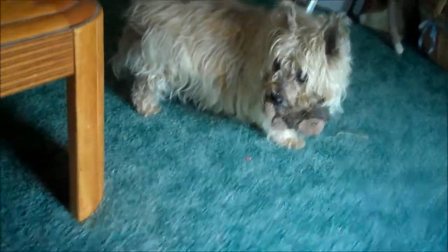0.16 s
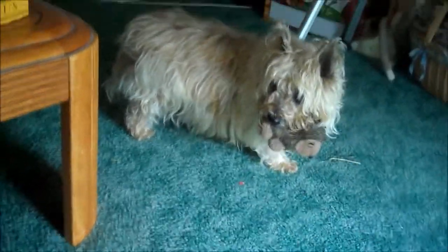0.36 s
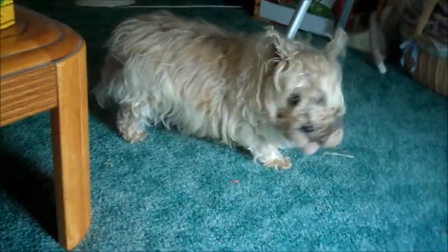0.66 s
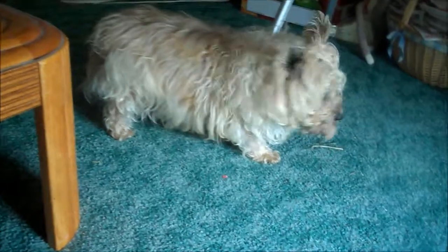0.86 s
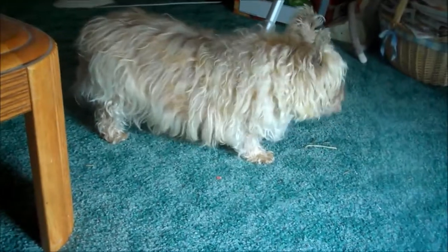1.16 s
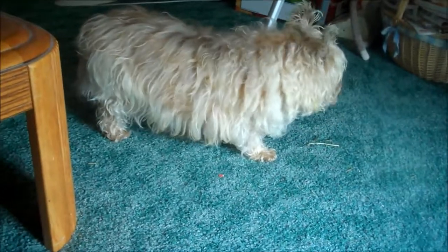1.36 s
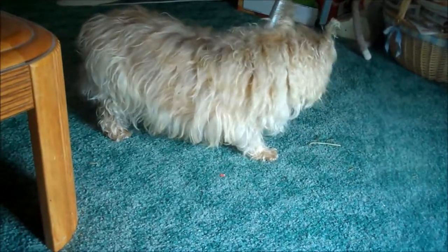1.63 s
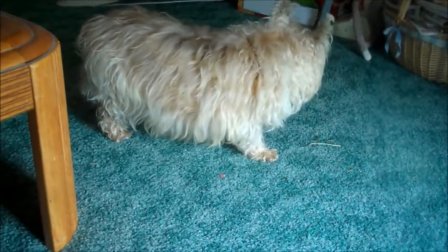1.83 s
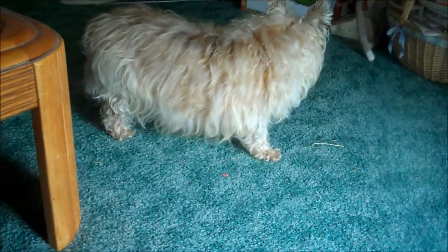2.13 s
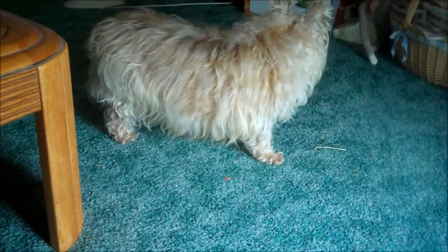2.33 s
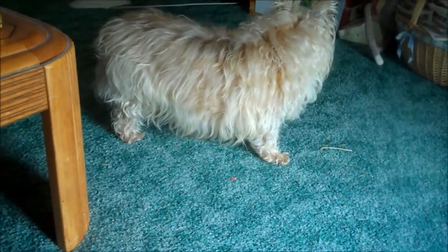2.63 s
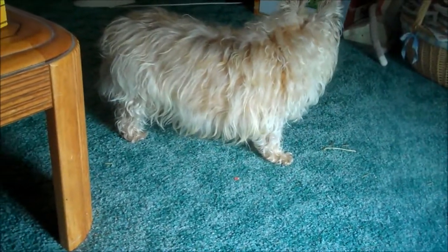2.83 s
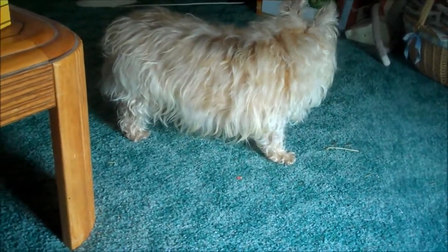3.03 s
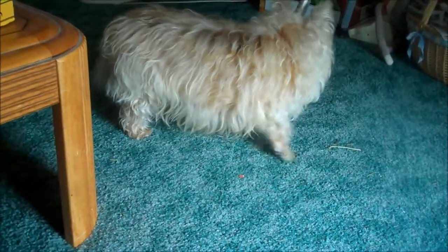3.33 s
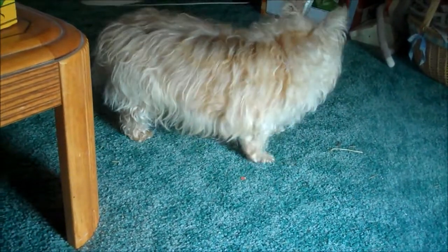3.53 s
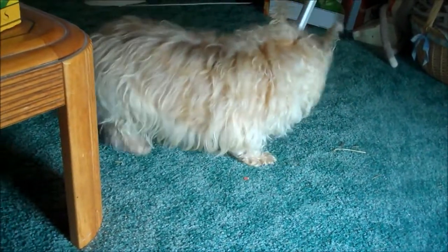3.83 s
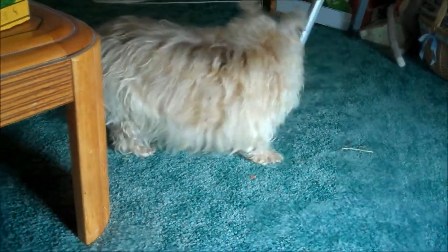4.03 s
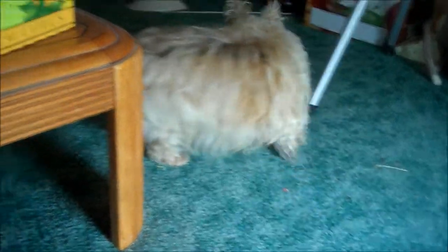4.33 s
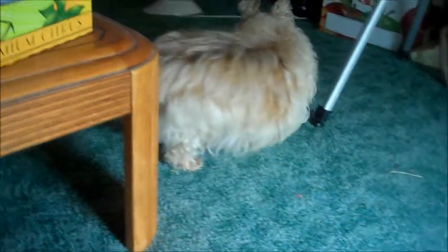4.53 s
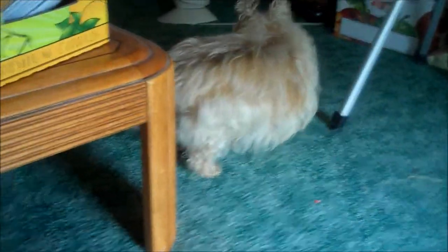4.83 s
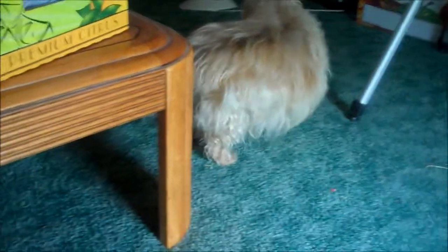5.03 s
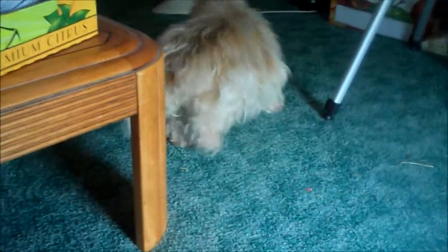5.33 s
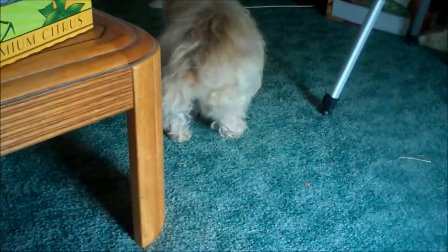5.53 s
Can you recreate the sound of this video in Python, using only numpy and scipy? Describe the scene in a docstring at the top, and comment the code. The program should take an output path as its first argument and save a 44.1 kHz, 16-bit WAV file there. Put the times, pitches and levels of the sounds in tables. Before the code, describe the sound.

A small dog whimpers nearby in a carpeted room with a short ring, over steady, faint microphone hiss. Each thin, high whine slides through its nose on a push of air that hisses in the nostrils, and most break downward into a short, low hoot. The first whine rises from the very start to about 0.4 seconds. A shorter, higher one follows at 0.7 seconds. The third slides down from 1.3 seconds and ends in a clear hoot at 1.6. After a pause, a stronger whine climbs from 2.4 to 2.7 seconds. The highest, a brief squeak, comes at 3 seconds, and a softer, wavering one at about 3.5. A faint snuff at 3.9 seconds precedes the last whine at 4.3, which sinks into the longest hoot. Three quick snuffs between 5 and 5.2 seconds end it, leaving only the hiss.

```python
"""A small terrier whimpers in a briefly ringing, carpeted room, over the steady hiss of a small camera.
Seven thin whines slide through its nose, each on a push of air that hisses in the nostrils.
Most break downward into a short, low hoot as the vocal folds slacken. A faint snuff comes before
the last whine, which sinks into the longest hoot. Three quick snuffs end it, about five seconds in."""
import sys
import numpy as np
from scipy import signal
from scipy.fft import rfft, irfft, next_fast_len
from scipy.io import wavfile
from scipy.ndimage import uniform_filter1d, map_coordinates

SR = 44100
rng = np.random.default_rng(int(sys.argv[2]) if len(sys.argv) > 2 else 0)


def generate_wav(signal):
    """Clip the signal to [-1, 1] and save it as 16-bit WAV at the path in sys.argv[1]."""
    frames = np.transpose(np.atleast_2d(signal))
    scaled = np.clip(frames, -1, 1) * 32767
    pcm = np.round(scaled).astype(np.int16)
    wavfile.write(sys.argv[1], SR, pcm)


N = 250916
TOP_HZ = 14220  # the camera's band limit

# glide of each whine: (time [s], pitch [Hz], relative level [dB])
WHINE_1 = [(0.0, 489.8, -52.5), (0.108, 520.8, -47), (0.196, 594, -42), (0.25, 701, -41.5),
           (0.264, 676, -46.5), (0.32, 733.5, -34.5), (0.376, 700.4, -47), (0.406, 679, -47.5),
           (0.425, 649, -45.5)]
WHINE_2 = [(0.738, 883, -44.5), (0.754, 823, -34.5), (0.77, 798.3, -40), (0.8, 830.4, -35.5),
           (0.876, 832.4, -47.5), (0.9, 824, -73.5)]
WHINE_3 = [(1.285, 875, -42), (1.295, 831.4, -39.5), (1.321, 792, -37), (1.345, 794, -38),
           (1.377, 724, -45), (1.399, 731, -46.5), (1.445, 678.4, -43), (1.549, 650, -53),
           (1.555, 629, -41.5)]
WHINE_4 = [(2.38, 758, -55), (2.4, 728, -48.5), (2.422, 786, -55), (2.432, 805.6, -44), (2.468, 836, -36.5),
           (2.616, 863.7, -32), (2.665, 843, -34.5)]
WHINE_5 = [(2.995, 1072, -49.5), (3.009, 1063, -36), (3.041, 1067, -41.5), (3.065, 1019, -36.5)]
WHINE_6 = [(3.43, 799, -49.5), (3.466, 729, -48), (3.498, 793.6, -48), (3.52, 774, -49),
           (3.564, 766.5, -46), (3.578, 773, -71), (3.592, 764.5, -48.5), (3.668, 824, -39),
           (3.69, 803, -43)]
WHINE_7 = [(4.312, 825, -48.5), (4.356, 791, -46.5), (4.368, 821, -39.5), (4.386, 846, -50.5),
           (4.415, 818, -41)]
# notes of the slackened folds:
# (time [s], hold [s], release [s], pitch [Hz], relative level [dB], relative escaping air [dB])
HOOTS = [(0.439, 0.012, 0.0069, 417, -53, -39.5), (0.937, 0.0091, .007, 411, -54, -46),
         (1.568, 0.019, 0.016, 398, -28, -57), (2.275, 0.023, 0.0049, 390.5, -48.5, -66),
         (2.683, 0.013, 0.0023, 414.7, -34, -45), (3.081, 0.014, 0.0025, 425, -31, -45),
         (3.551, 0.015, 0.0037, 648, -48, -73), (3.700, 0.0138, 0.0023, 426.6, -35.5, -38.5),
         (4.436, 0.12, 0.03, 437.5, -32.5, -68.5)]


def amp(db):
    """Decibels to gain."""
    return 10 ** (np.asarray(db) / 20)


def unit(x):
    """x at rms 1."""
    return x / np.sqrt(np.mean(x ** 2) + 1e-20)


def along(points, hz):
    """Read (frequency, value) points on a log frequency axis."""
    freqs, values = np.transpose(points)
    return np.interp(np.log(hz + 1), np.log(freqs + 1), values)


def curves(rows, t):
    """Read each column after the time column at the times t."""
    times, *columns = np.transpose(rows)
    return [np.interp(t, times, column) for column in columns]


def samples(start, end, margin=0.02):
    """Sample numbers from just before start to just after end."""
    return np.arange(max(0, int((start - margin) * SR)), min(N, int((end + margin) * SR)))


def wobble(rate, t):
    """A smooth random curve, rate knots a second."""
    return map_coordinates(rng.standard_normal(int(N / SR * rate) + 4), [t * rate])


def hump(hz, centre_hz, width_hz):
    """A resonance shape, 1 at its centre."""
    return 1 / (1 + (2 * (hz - centre_hz) / width_hz) ** 2)


def filtered(x, response):
    """x through a complex frequency response."""
    size = x.shape[-1]
    padded = next_fast_len(size + SR // 10)
    return irfft(rfft(x, padded) * response(np.fft.rfftfreq(padded, 1 / SR)), padded)[..., :size]


def noise(colour, size=N):
    """Noise of rms 1 with the given spectrum."""
    return unit(filtered(rng.standard_normal(size), lambda hz: amp(along(colour, hz))))


def pair(a, b, likeness):
    """Mix two unrelated signals to stereo with the given left-right likeness."""
    angle = lambda hz: np.arccos(np.clip(along(likeness, hz), -1, 1)) / 2
    mid = filtered(a, lambda hz: np.cos(angle(hz)))
    side = filtered(b, lambda hz: np.sin(angle(hz)))
    return np.array([mid + side, mid - side])


def background(level_db=-60.5):
    """A wide bed of steady microphone hiss over faint room rumble."""
    # spectrum of the bed: (frequency [Hz], level [dB])
    colour = [(8, -33), (22, -16.5), (33, -1), (60, -5), (80, -2.5), (105, -7), (400, -4), (1000, -5.5),
              (2000, -8), (6000, -12.5), (14000, -16)]
    # its stereo image: (frequency [Hz], left-right likeness [0-1])
    likeness = [(30, 0.068), (80, 0.035), (300, 0.083), (1500, 0.036), (10000, 0.023)]
    return amp(level_db) * pair(noise(colour), noise(colour), likeness)


def airflow(t, rise_db=14.5, sag_db=3, attack_s=0.043):
    """Each push of air through the nose arches up to a crest, sags and is let go."""
    # breaths: (start [s], crest [s], end [s], release [s], relative crest level [dB])
    pushes = [(0.0, 0.317, 0.43, 0.008, -41), (0.639, 0.758, 0.91, 0.057, -45.5),
              (1.195, 1.31, 1.617, .025, -46.5), (2.266, 2.62, 2.73, 0.039, -48.5),
              (2.968, 3.08, 3.11, 0.045, -45.5), (3.382, 3.515, 3.61, 0.12, -48),
              (4.22, 4.45, 4.7, 0.042, -48)]
    flow = np.zeros(len(t))
    for start, crest, end, release, db in pushes:
        rising = np.clip((crest - t) / (crest - start), 0, 1)
        sagging = np.clip((t - crest) / (end - crest), 0, 1)
        arch = amp(db - rise_db * rising ** 2 - sag_db * sagging ** 2)
        flow += arch * np.exp(-np.maximum(start - t, 0) / attack_s - np.maximum(t - end, 0) / release)
    return flow


def nose_air(hiss_db=-7, gust_db=1.95):
    """Turbulence in the nostrils rings the nasal passages; extra air escapes as the folds slacken."""
    # spectrum of the nostril hiss: (frequency [Hz], level [dB])
    nostrils = [(150, -19), (400, -6.5), (1100, -2.5), (1800, -11.5), (2450, -6), (2900, -6), (3550, -1),
                (4400, -3), (5600, -3), (6900, -0.5), (8600, -7), (9600, -12.5), (11500, -19), (14000, -29)]
    # nasal resonances: (centre [Hz], width [Hz], boost [dB])
    modes = [(3330, 140, 2.5), (5460, 420, 9.5), (6880, 400, 4.5), (8220, 230, 7.5)]
    t = np.arange(N) / SR
    escaping = sum(amp(db) * swell(t - start, hold, release) for start, hold, release, _, _, db in HOOTS)
    passages = lambda hz: amp(sum(db * hump(hz, centre, width) for centre, width, db in modes))
    hiss = unit(filtered(noise(nostrils), passages))
    return (airflow(t) + escaping) * amp(hiss_db + gust_db * wobble(80, t)) * hiss


def folds(span, pitch, level_db, upper_db, rough, second_db, tilt_db,
          mouth_hz, mouth_db, ring_hz, ring_db, shimmer_db=4, flutter_db=3.5, rasp_db=-26):
    """The vocal folds sing a thin tone whose overtones slide through the resonances of the muzzle."""
    # the second harmonic swells across the throat's first resonance:
    # (pitch [Hz], level over the fundamental [dB])
    second_swell = [(400, -19.5), (440, -14.5), (490, 5), (560, 7), (650, -3), (700, -5.5), (770, -13.5),
                    (850, -24.5), (1060, -12)]
    # overtone colour of throat and muzzle: (frequency [Hz], gain [dB])
    throat = [(1200, 17.5), (1750, -13), (2150, 9), (2550, 1.5), (2900, -7.5), (3400, 1), (4400, -3.5),
              (5100, 3), (5900, -4), (6800, 5), (7700, -4.5), (8400, -3), (9300, -14.5), (14000, -23)]
    # spectrum of the slack folds' rasp: (frequency [Hz], level [dB])
    rasp_colour = [(300, -43), (650, -9), (1100, 8), (1350, -3.5), (1800, -63), (4000, -31)]
    t = span / SR
    second_gain = amp(level_db + second_db + along(second_swell, pitch))
    waver = 0.0248 * rough * wobble(60, t)
    # the folds turn unsteady while the pitch collapses
    fall_octaves_per_s = uniform_filter1d(np.maximum(0, -np.gradient(np.log2(pitch)) * SR), size=600)
    rough = np.clip(rough + 0.013 * fall_octaves_per_s, 0, 1)
    # uneven cycles blur the high overtones far more than the fundamental
    jitter = 0.033 * rough * wobble(450, t)
    pitch = pitch * (1 + jitter + waver)
    phase = 2 * np.pi * np.cumsum(pitch) / SR
    orders = np.arange(3, 21)[:, None]
    hz = orders * pitch
    mouth = mouth_db * hump(hz, mouth_hz, width_hz=440)
    nasal_ring = ring_db * hump(hz, ring_hz, width_hz=450)
    gains = amp(along(throat, hz) + tilt_db * np.log2(orders) + mouth + nasal_ring) * (hz < TOP_HZ)
    gains /= np.linalg.norm(gains, axis=0)
    # each overtone swells and fades on its own
    flutter = amp(flutter_db * np.array([wobble(45, t) for _ in orders]))
    offsets = rng.uniform(0, 2 * np.pi, orders.shape)
    upper = np.sum(gains * flutter * np.sin(orders * phase + offsets), axis=0)
    tone = amp(level_db) * np.sin(phase) + second_gain * np.sin(2 * phase) + amp(upper_db) * upper
    # below 700 Hz the slack folds leak a rasping puff once a cycle
    slack = np.clip((700 - pitch) / 200, 0, 1)
    opening = (1 + np.sin(phase)) / 2
    rasp = slack * (1 + rough) * amp(level_db + rasp_db) * opening * noise(rasp_colour, len(span))
    shimmer = amp(rough * shimmer_db * wobble(160, t))
    return np.sqrt(2) * (tone + rasp) * shimmer


def whine(contour, rough, second_db, overtone_db, *muzzle):
    """One whine eases in from above, glides and breaks downward; a harder push of air brightens it."""
    onset_s, onset_ratio, onset_db = 0.003, 1.0395, 4.5
    break_s, break_hz, break_fade_db, break_dull_db = 0.019, 458, 18.5, 10
    overtone_attack_s, fade_s = 0.01, 0.0052
    (start, start_hz, start_db), (end, _, end_db) = contour[0], contour[-1]
    first, last = start - onset_s, end + break_s
    onset = (first, start_hz * onset_ratio, start_db - onset_db)
    collapse = (last, break_hz, end_db - break_fade_db)
    span = samples(first, last)
    t = span / SR
    pitch, level_db = curves([onset, *contour, collapse], t)
    push_db = 20 * np.log10(airflow(t))
    # the overtones follow tone and breath, arrive late and drain away in the break
    upper_db = overtone_db + 0.3 * (level_db - level_db.max()) + 0.22 * (push_db - push_db.max())
    upper_db -= onset_db * np.exp(-np.maximum(t - first, 0) / overtone_attack_s)
    upper_db -= break_dull_db * np.clip((t - end) / break_s, 0, 1)
    gate = np.clip(1 + np.minimum(t - first, last - t) / fade_s, 0, 1)
    out = np.zeros(N)
    out[span] = gate * folds(span, pitch, level_db, upper_db, rough, second_db, *muzzle)
    return out


def whimper():
    """Seven whines through the nose, each with its own glide and muzzle colour."""
    # voicing: (glide, roughness [0-1], second harmonic gain [dB], relative overtone level [dB],
    # tilt [dB/octave], mouth resonance [Hz], its gain [dB], nasal ring [Hz], its gain [dB])
    whines = [(WHINE_1, 0.3, 0, -49, -3.2, 3100, 6.6, 8500, 18),
              (WHINE_2, 0.095, 3.8, -43, -3.2, 2230, -8, 6650, 6.3),
              (WHINE_3, 0.184, -1.4, -50.5, -0.39, 2430, 6.2, 3400, 11),
              (WHINE_4, 0.082, -7, -49.5, -0.12, 2570, 7.7, 6800, 3.4),
              (WHINE_5, .13, -0.95, -48, -2.1, 1800, 1, 4250, 5.8),
              (WHINE_6, 0.203, 3.6, -50.5, 0, 2000, -0.86, 5480, 8.4),
              (WHINE_7, .2, -0.9, -57, .3, 2400, -0.77, 4900, 6)]
    return sum(whine(*row) for row in whines)


def swell(age, hold, release):
    """Envelope of a hoot: attack, hold and exponential release; longer hoots swell more slowly."""
    attack_s = 0.0039 + 0.071 * hold
    return (1 - np.exp(-np.maximum(age, 0) / attack_s)) * np.exp(-np.maximum(age - hold, 0) / release)


def hoots(overtone_db=-30, scoop_hz=71.4, settle_s=0.00812, sag_hz_per_s=150):
    """Slackened folds give short, dull, low notes that start high, settle and sag."""
    out = np.zeros(N)
    for start, hold, release, hz, db, _ in HOOTS:
        span = samples(start, start + hold + np.log(1000) * release)
        age = np.maximum(span / SR - start, 0)
        pitch = hz + scoop_hz * np.exp(-age / settle_s) - sag_hz_per_s * age
        tone = folds(span, pitch, db, db + overtone_db, rough=0.17, second_db=-3, tilt_db=6,
                     mouth_hz=2300, mouth_db=-18, ring_hz=3670, ring_db=14)
        out[span] += tone * swell(age, hold, release)
    return out


def snuffs():
    """Sharp puffs of air from the dog's nose."""
    # snuffs: (time [s], level [dB], rise [s], 60 dB decay [s])
    puffs = [(3.895, -54.5, 0.017, 0.19), (5.018, -38.5, 0.0031, 0.1), (5.047, -46, 0.0028, 0.12),
             (5.19, -40.5, 0.00067, 0.055)]
    # their spectrum: (frequency [Hz], level [dB])
    colour = [(100, -25), (200, -10.5), (400, -1), (600, -0.5), (1200, -10), (1600, -4.5), (2000, -10),
              (3200, -9), (3700, -13), (6000, -5), (7600, -10), (8500, -17), (14000, -30)]
    t = np.arange(N) / SR
    envelope = np.zeros(N)
    for start, db, rise, t60 in puffs:
        age = np.maximum(t - start, 0)
        envelope += amp(db - 60 * age / t60) * (1 - np.exp(-age / rise))
    return envelope * noise(colour)


def furniture(x, scatter_db=-7, corner_hz=3000, count=8):
    """Nearby table legs and edges throw back the treble, combing it differently left and right."""
    delays_s = rng.uniform(0.001, 0.012, (2, count))
    gains = rng.choice([-1, 1], delays_s.shape) / np.sqrt(count)
    taps = np.zeros((2, SR // 50))
    np.put_along_axis(taps, (delays_s * SR).astype(int), gains, axis=1)
    treble = filtered(x, lambda hz: hz ** 2 / (hz ** 2 + corner_hz ** 2))
    return amp(scatter_db) * signal.fftconvolve(treble[None], taps, axes=1)[:, :N]


def ports(x):
    """The dog's sound reaches the two microphone ports with a level and phase difference."""
    # the dog turns away: (time [s], left minus right [dB])
    head_turn = [(0, 3), (2.7, 2.2), (3.0, 2), (4.6, 0.5)]
    # level between the ports: (frequency [Hz], left minus right [dB])
    balance = [(380, -1.5), (700, 0), (1300, -3), (2400, -1), (3800, -2.5), (5200, -6), (6050, -16),
               (6900, 9), (8000, 5), (8600, 13), (10000, 12), (14000, -5)]
    # phase between the ports: (frequency [Hz], left lead [rad])
    lead = [(300, 0.06), (1000, 0.32), (2000, 0.8), (2600, -1.35), (3300, -1.3), (5600, -1.7), (7000, 1.9),
            (8700, -3), (13000, -0.9)]
    sides = np.array([[0.5], [-0.5]])
    panned = x * amp(sides * curves(head_turn, np.arange(N) / SR)[0])
    response = lambda hz: amp(sides * along(balance, hz)) * np.exp(1j * sides * along(lead, hz))
    return filtered(panned, response)


def room(send, predelay_s=0.0045):
    """The carpeted room adds a short diffuse tail, centred in the lows and wide in the highs."""
    # tone of the room: (frequency [Hz], gain [dB])
    colour = [(150, 5), (450, -3), (1000, 1), (2500, 0.5), (4000, 0.5), (7000, 0), (12000, 3.5)]
    # its ring: (frequency [Hz], 60 dB decay [s])
    decay = [(200, 0.27), (450, 0.37), (1000, 0.4), (3000, 0.31), (7000, 0.39), (13000, 0.12)]
    # its stereo image: (frequency [Hz], left-right likeness [0-1])
    likeness = [(400, 0.99), (1000, 0.92), (2500, 0.092), (6000, 0)]
    coloured = filtered(send, lambda hz: amp(along(colour, hz)))
    hz, t, bands = signal.stft(rng.standard_normal((2, SR // 2)), SR, nperseg=256)
    tail = signal.istft(bands * amp(-60 * t / along(decay, hz)[:, None]), SR, nperseg=256)[1]
    tail *= np.clip(np.arange(tail.shape[1]) / SR / predelay_s - 1, 0, 1)
    wet = signal.fftconvolve(coloured[None], tail / np.linalg.norm(tail[0]), axes=1)[:, :N]
    return pair(*wet, likeness)


def scene(voice_db=-0.5, voice_send_db=-8.5, air_send_db=-10, snuff_send_db=-6):
    """Voice, nose air and snuffs, each with its own send to the room, over the bed of hiss."""
    voice = amp(voice_db) * (whimper() + hoots())
    air, puffs = nose_air(), snuffs()
    dog = voice + air + puffs
    wet = room(amp(voice_send_db) * voice + amp(air_send_db) * air + amp(snuff_send_db) * puffs)
    return ports(dog + furniture(dog)) + wet + background()


def record(dry):
    """The camera keeps nothing above its band limit."""
    return filtered(dry, lambda hz: hz < TOP_HZ)


dry = scene()
out = record(dry)
generate_wav(out)
```